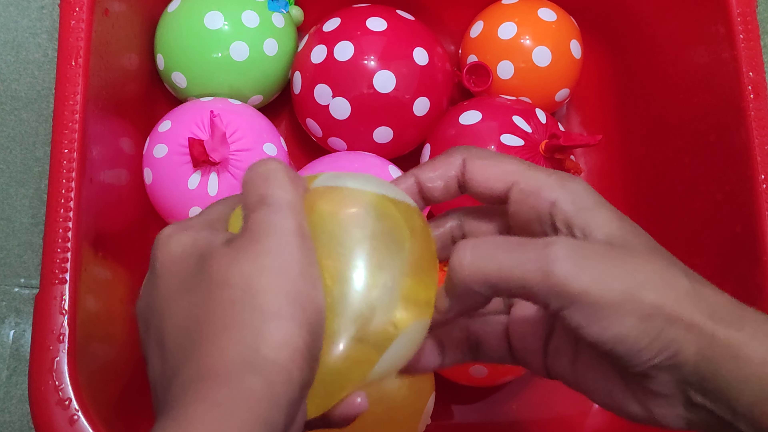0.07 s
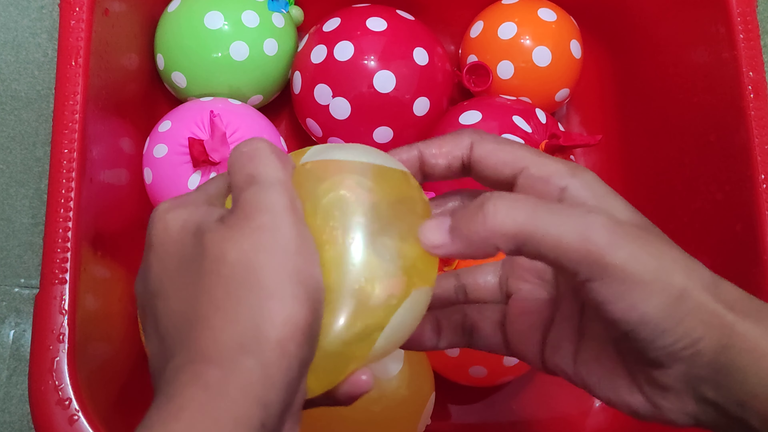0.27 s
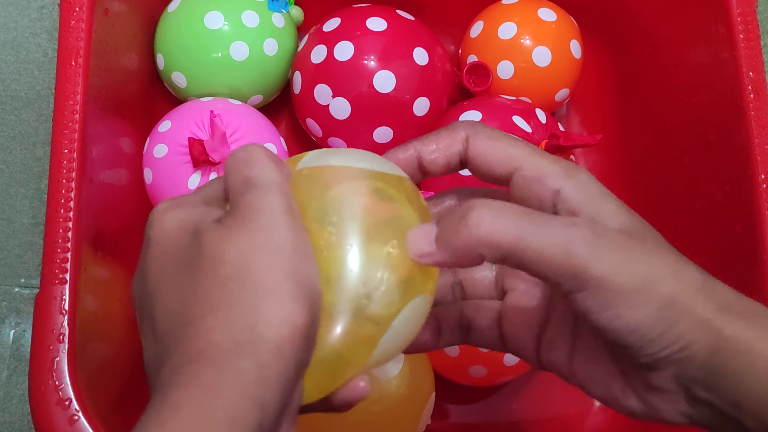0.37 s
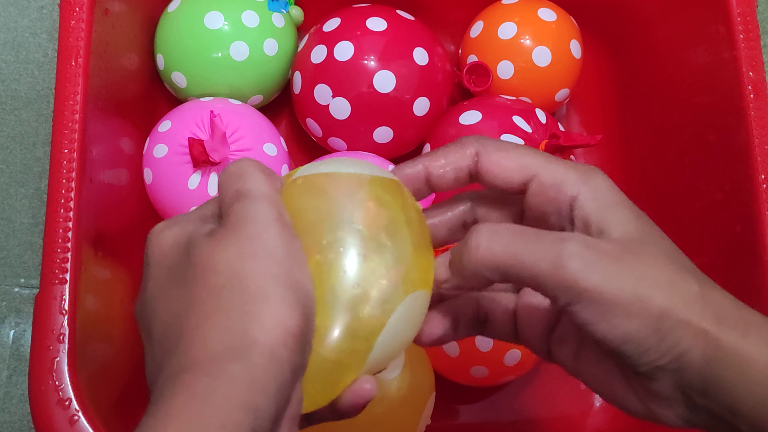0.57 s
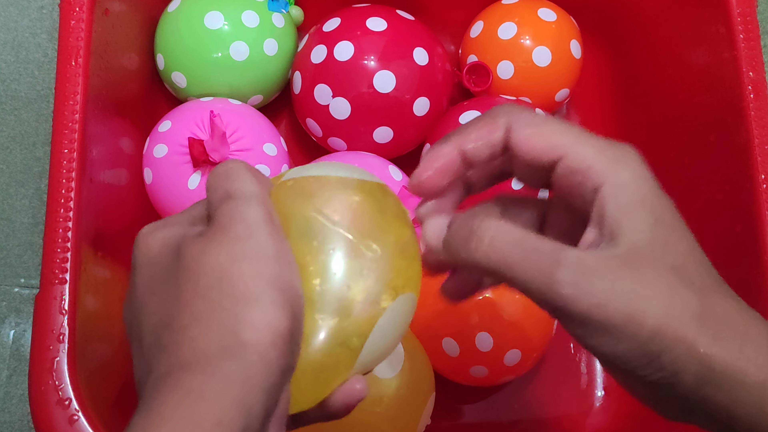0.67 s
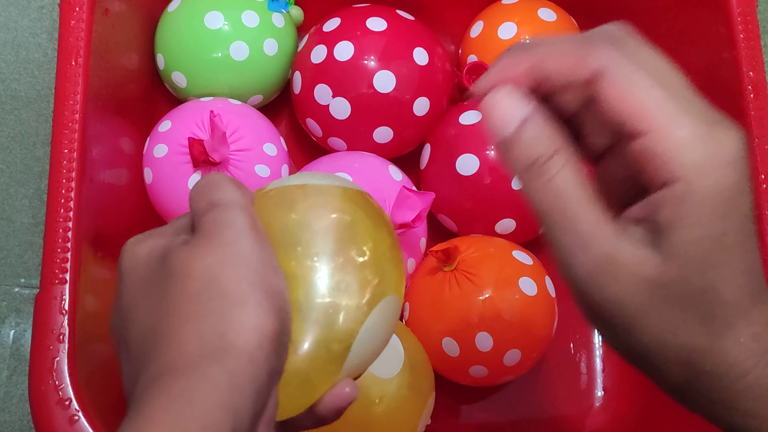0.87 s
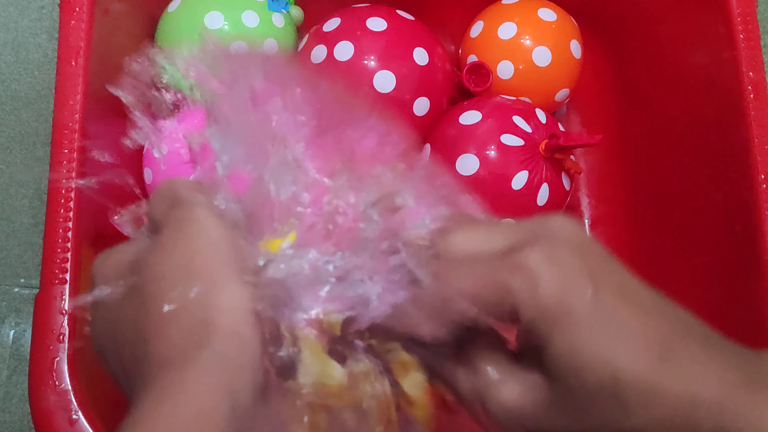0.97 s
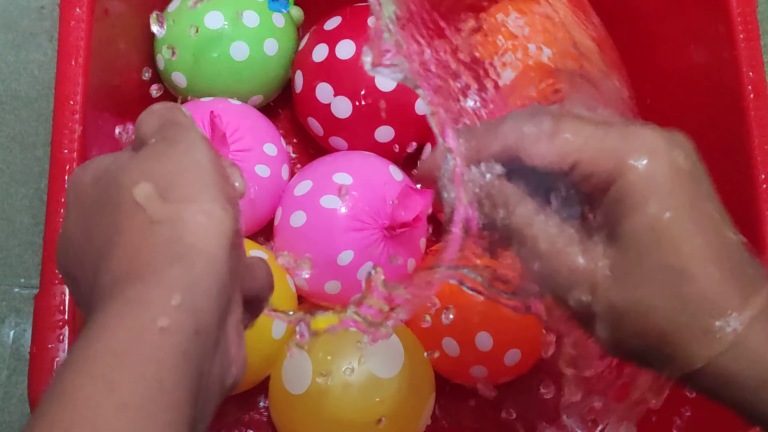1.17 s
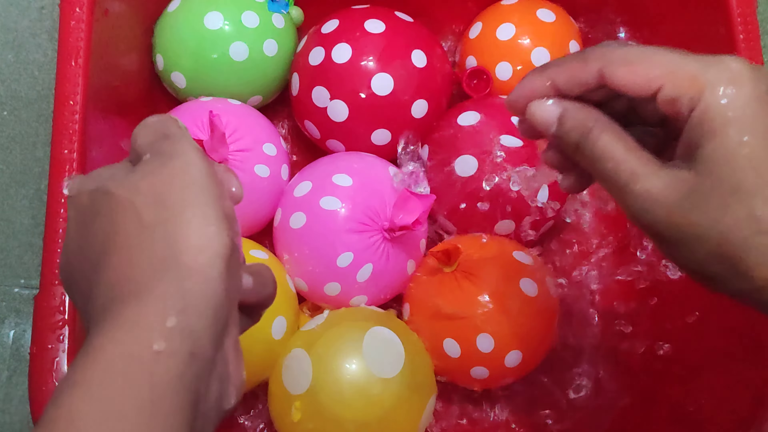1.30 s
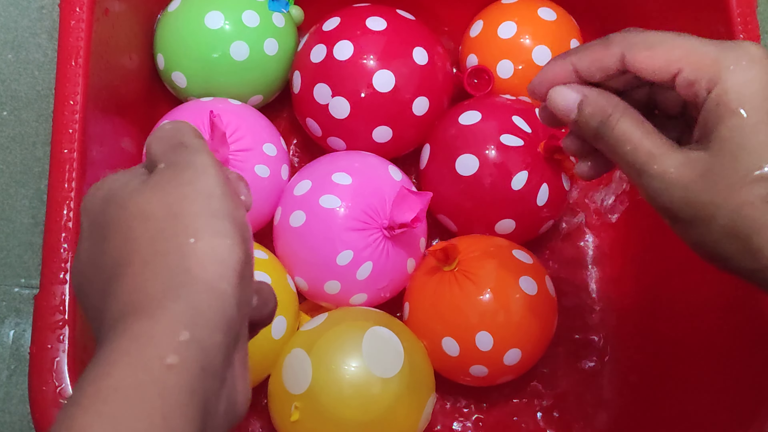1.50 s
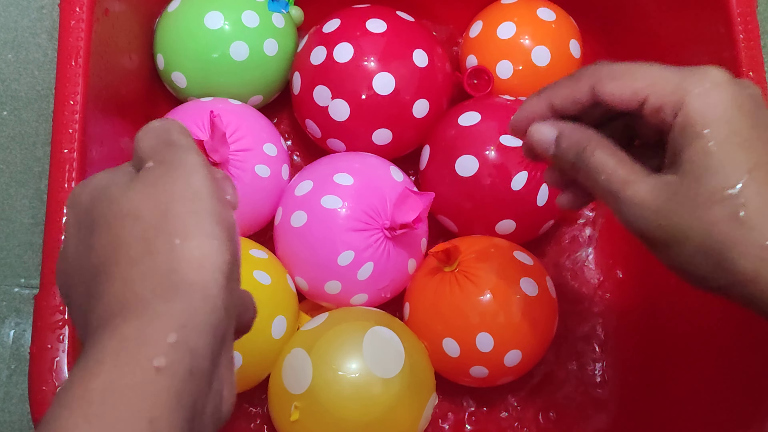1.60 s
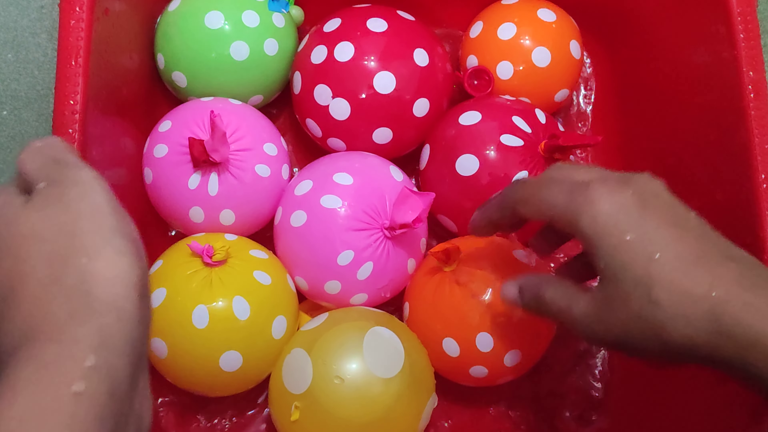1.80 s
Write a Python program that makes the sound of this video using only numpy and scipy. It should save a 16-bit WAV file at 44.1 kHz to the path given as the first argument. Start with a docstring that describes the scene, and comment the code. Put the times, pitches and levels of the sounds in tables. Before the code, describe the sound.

A water balloon bursts in a small, hard-walled room. Fingers first rub and squeak on the wet rubber, then comes a sharp crack, and water slaps onto other balloons and sloshes in a plastic tub, ending in a few drips.

```python
"""A water balloon bursts

Fingers pinch a water balloon over a plastic tub in a small, hard-walled room: the wet rubber sticks,
slips and squeaks. The skin bursts with a crack and a puff of air; the water slaps onto other balloons,
sprays and runs off into the tub. A few last drops tick, and the room rings after everything."""
import sys
import numpy as np
from scipy import signal
from scipy.fft import rfft, irfft, next_fast_len
from scipy.io import wavfile
from scipy.ndimage import map_coordinates

SR = 44100
rng = np.random.default_rng(int(sys.argv[2]) if len(sys.argv) > 2 else 0)


def wrap_up_sound(samples):
    """Save the sound to the file named by the first command line argument, as 16-bit audio."""
    columns = np.atleast_2d(samples).T
    # keep every value between -1 and 1, then stretch to whole-number steps
    tamed = np.clip(columns, -1, 1)
    steps = np.round(tamed * 32767).astype(np.int16)
    wavfile.write(sys.argv[1], SR, steps)


N = 81585

# Levels in a table are relative: they compare its rows with each other.
# A fade time is how long a sound takes to drop by 60 dB. A tone says how strong each frequency is.

# the skin tears and whips back (time [s], level [dB], fade time [s])
TEARS = [(1.0093, -4.5, 0.029), (1.0185, -12.5, 0.041), (1.031, -17.5, 0.011)]
# tone of the crack (frequency [Hz], level [dB])
CRACK_TONE = [(60, -24), (150, -20.5), (400, -15), (800, -10), (1200, -11.5), (1900, -4), (3800, -2.5),
              (5500, -9.5), (9000, -23), (15500, -19)]
# finger strokes on the rubber (time [s], length [s], rise [s], level [dB], slip rate [Hz],
# pitch glide [octaves], roughness [0-1], treble [dB], ring of the skin at the slip rate [dB])
STROKES = [(0.0, 0.017, 0.00067, -27.5, 850, 0.043, 0.77, 0.5, 9),
           (.1033, .0032, .0002, -14.5, 2200, 0, .8, 2, 0),
           (0.11, 0.011, 0.00024, -15.5, 810, 0.018, 0.77, -1.5, 7),
           (0.123, 0.034, 0.0021, -17, 1255, -0.02, .45, 7.5, 3.5),
           (0.217, .08, 0.02, -23.5, 1150, .1, .7, -0.5, -2.5),
           (.321, .056, .034, -18.5, 1065, .02, .55, 2, 2),
           (0.434, .025, .01, -31.5, 1300, -0.0093, .8, -12, -3),
           (.5343, .008, .0002, -12.5, 1390, 0, .65, 1, 5),
           (0.543, 0.0218, 0.0007, -15.5, 1410, -.05, .65, 3.5, -12),
           (0.61, 0.098, 0.047, -23, 1330, 0.052, .65, -3.5, -4.5),
           (0.705, 0.039, 0.0078, -32.5, 1240, -0.0024, .6, 3.5, 4)]
# tone of the stretched rubber (frequency [Hz], level [dB])
SKIN_TONE = [(180, -75), (300, -27), (526, -33.5), (680, -22.5), (800, -15.5), (1050, -6.5), (1400, -9),
             (1650, -11), (2000, 1), (2350, -2.5), (3200, -6), (4000, -8.5), (4900, -10), (7370, -12.5),
             (8990, -22), (11300, -19), (15500, -23)]
# pitches at which the rubber rings (frequency [Hz], width [Hz], level [dB])
SKIN_RINGS = [(1910, 72, -1), (2200, 84, -22), (2310, 16, -2), (2440, 25, -4), (2836, 59, 9.5),
              (3130, 37, -6), (3770, 110, 7), (4000, 42, -2), (5795, 110, 7.5), (6650, 160, -7)]
# tone of water striking the balloons (frequency [Hz], level [dB])
SLAP_TONE = [(240, -32), (400, -8.5), (453, -26.5), (870, -12), (1420, -10), (1940, -3), (2720, -1),
             (4670, -2), (8000, -14), (10400, -38), (17600, -120)]
# its loudness over time (time [s], level [dB])
SLAP_LEVELS = [(1.07, -18.5), (1.09, -25.5), (1.162, -21.5), (1.32, -33), (1.398, -32), (1.406, -30),
               (1.512, -43.5), (1.6, -43.5)]
# tone of the fine spray (frequency [Hz], level [dB])
SPRAY_TONE = [(2500, -33), (5000, -11), (6600, -0.5), (8800, -10.5), (11000, -4.5), (14000, -5.5),
              (16000, -4)]
# its loudness over time (time [s], level [dB])
SPRAY_LEVELS = [(1.07, -24.5), (1.082, -39.5), (1.302, -33.5), (1.34, -39.5), (1.358, -30.5),
                (1.388, -34.5), (1.404, -31.5), (1.6, -54)]
# tone of water moving in the tub (frequency [Hz], level [dB])
SLOSH_TONE = [(25, -16), (60, -18), (120, -2.5), (200, -10), (260, -0.5), (350, 1), (600, -3.5), (900, 3.5),
              (1600, -15.5)]
# its loudness over time (time [s], level [dB])
SLOSH_LEVELS = [(1.08, -57), (1.164, -38), (1.41, -39.5), (1.85, -52)]
# single drops on tight rubber (time [s], level [dB], pitch [Hz], width [octaves], fade time [s])
LAST_DROPS = [(1.3577, -22.5, 11400, 1.2, 0.013), (1.625, -25, 11100, 2.2, 0.0042),
              (1.637, -30.5, 2070, 0.43, 0.014), (1.6654, -28.5, 13800, 0.22, 0.012),
              (1.7185, -38, 5990, 0.16, 0.037), (1.806, -41, 3900, 0.13, 0.033),
              (1.83, -45, 4030, 0.073, 0.021)]
# big air pockets in the tub (time [s], level [dB], pitch [Hz])
AIR_POCKETS = [(1.2, -36, 249), (1.32, -37.5, 356.5), (1.395, -33, 324.7), (1.615, -50, 315)]
# low notes at which the tub and room ring (pitch [Hz], level [dB])
BOOM_NOTES = [(86.1, -54), (156.1, -55), (204.6, -78), (242.2, -59), (323.0, -55), (409.1, -77),
              (495.3, -59), (570.6, -53.5), (683.7, -60.5)]
# slow swings of air pressure (time [s], width [s], left [amplitude], right [amplitude])
AIR_SWAYS = [(.15, .03, -0.025, -.02), (.26, 0.069, 0.026, 0.018), (0.562, 0.015, -0.016, -0.018),
             (.68, 0.052, 0.012, .015), (1.16, 0.077, -0.046, 0.054), (1.25, 0.097, -.11, -0.023)]
# tone of the room's rumble (frequency [Hz], level [dB])
RUMBLE_TONE = [(25, 13), (60, 6), (90, -4), (150, -2.5), (330, -2), (600, -3.5), (2000, -12.5),
               (8000, -25.5), (16000, -33)]
# how long the room echoes (frequency [Hz], fade time [s])
ECHO_FADES = [(100, 0.3), (500, 0.34), (1300, 0.51), (3500, 0.53), (9000, 0.36), (15000, 0.43)]
# how alike left and right sound (frequency [Hz], likeness [0-1])
LIKENESS = [(60, 0.2), (250, 0.79), (500, 0.56), (1000, 0.041), (15000, 0.075)]

POP_S = TEARS[0][0]
LEAD_MS = 0.094  # the balloon is left of centre, so the left microphone hears it first


def pop():
    """The skin rips with a sharp snap and a few quick cracks, and pushes air mostly to the left."""
    snap_s, puff_rise_s, puff_fall_s = 0.00024, 0.001, 0.011
    t = since(POP_S)
    rip = sum(amp(db) * burst(start, fade_s) for start, db, fade_s in TEARS)
    crack = coloured(rip, tone(CRACK_TONE))
    snap = amp(-7) * (t > 0) * (1 - t / snap_s) * np.exp(-t / snap_s)  # the first pressure spike
    puff = amp(-7) * (1 - np.exp(-t / puff_rise_s)) * np.exp(-t / puff_fall_s)
    return room(snap + crack, echo_db=3.5, lead_ms=LEAD_MS) + np.outer([1, -0.25], puff)


def squeaks():
    """Each stroke is a fast run of slips that rings the rubber; the rougher, the more uneven it is."""
    release_s, treble_hz, ring_width_hz, wander_octaves = 0.0052, 5000, 300, 0.27
    rubbing = np.zeros(N)
    for start, length, rise, db, slip_hz, glide, rough, treble_db, ring_db in STROKES:
        t = since(start)
        bend = glide * (np.minimum(t / length, 1) - 0.5)
        rate = slip_hz * 2 ** (bend + wander_octaves * rough * wobble(170.37))
        phase = 2 * np.pi * np.cumsum(rate) / SR
        slips = unit(sum(np.cos(k * phase) * (k * rate < SR / 2) for k in range(1, 16)))
        scrape = unit(rng.standard_normal(N) * (1 + np.cos(phase)))  # a hiss with each slip
        stroke = np.sqrt(1 - rough) * slips + np.sqrt(rough) * scrape
        treble = lambda hz: treble_db * hz ** 2 / (hz ** 2 + treble_hz ** 2)
        stroke = filtered(stroke, lambda hz: amp(treble(hz) + ring_db * peak(hz, slip_hz, ring_width_hz)))
        loudness = np.minimum(t / rise, 1) * np.exp(-since(start + length) / release_s)
        rubbing += amp(db) * stroke * loudness
    rings = lambda hz: sum(amp(db - 5.5) * peak(hz, centre, width) for centre, width, db in SKIN_RINGS)
    skin = coloured(rubbing, lambda hz: tone(SKIN_TONE)(hz) * (1 + rings(hz)))
    return room(skin, echo_db=2.5, lead_ms=LEAD_MS)


def splash():
    """Water slaps the balloons, breaks into fine spray and sloshes in the tub, on both sides."""
    rise_s, trickle_s = 0.12, 1.574  # after trickle_s only a fading trickle is left
    slap = water(SLAP_TONE, hiss=0.5, count=2500, hz=2393, octaves=1.73,
                 cycles=2.95, scatter_db=4, chirp=0.028, samples=600)
    spray = water(SPRAY_TONE, hiss=0.55, count=3000, hz=8600, octaves=1,
                  cycles=2.1, scatter_db=2, chirp=0.0085, samples=120)
    slosh = water(SLOSH_TONE, hiss=3, count=400, hz=474, octaves=1.34,
                  cycles=3.4, scatter_db=6, chirp=0.02, samples=2000)
    level_db = lambda rows: np.interp(since(0), *np.transpose(rows))
    slap *= amp(level_db(SLAP_LEVELS) - 30 * since(trickle_s))
    spray *= amp(level_db(SPRAY_LEVELS) + 1 - 19 * since(trickle_s))
    slosh *= amp(level_db(SLOSH_LEVELS) - 2)
    swell = np.minimum(since(POP_S) / rise_s, 1)
    return room((slap + spray + slosh) * swell, echo_db=0)


def water(tone_rows, hiss, **droplet_settings):
    """A steady stereo rush of water: droplets plus hiss, shaped to one tone."""
    rush = lambda: droplets(**droplet_settings) + hiss * rng.standard_normal(N)
    pair = np.array([coloured(rush(), tone(tone_rows)) for _ in range(2)])
    return unit(spread(pair))


def droplets(count, hz, octaves, cycles, scatter_db, chirp, samples):
    """A steady patter of tiny droplets and bubbles, each ringing briefly as its pitch rises."""
    when, height, softness = rng.random((count, 3)).T[:, :, None]
    pitch = hz * 2 ** (octaves * (2 * height - 1))
    age = pitch * np.arange(samples) / SR / cycles  # reaches 1 after about `cycles` swings
    strength = amp(-scatter_db * np.log(0.034 + softness))  # many soft ones, a few loud
    fade = np.exp(-age) * np.linspace(1, 0, samples)
    pings = strength * fade * np.sin(2 * np.pi * cycles * age * (1 + chirp * age))
    places = (when * N).astype(int) + np.arange(samples)
    return unit(np.bincount(places.ravel(), pings.ravel(), N)[:N])  # add each ping at its place


def drops():
    """Stray drops tick on the balloons, each a short band of noise."""
    ticks = np.zeros(N)
    for start, db, pitch, octaves, fade_s in LAST_DROPS:
        band = lambda hz: 1 / (1 + (np.log2((hz + 1) / pitch) / octaves) ** 2)
        ticks += amp(db) * coloured(burst(start, fade_s), band)
    return room(ticks, echo_db=5.5)


def gulps():
    """Trapped air rings low under the falling water."""
    ring = lambda t, hz: swell_and_fade(t, rise_s=0.012, fade_s=0.41) * np.sin(2 * np.pi * hz * t)
    return sum(amp(db) * ring(since(start), hz) for start, db, hz in AIR_POCKETS)


def boom():
    """The weight of the water sets the low notes of the tub and room ringing."""
    t = since(1.08)
    swell = swell_and_fade(t, rise_s=0.21, fade_s=2.4)
    ring = sum(amp(db + 1.8 * wobble(6.99)) * np.sin(2 * np.pi * hz * t + 0.64 * wobble(9.2))
               for hz, db in BOOM_NOTES)
    return amp(5) * ring * swell / swell.max()


def sway():
    """Air moved by the hands and the falling water presses slowly on each microphone."""
    return sum(np.outer([left, right], np.exp(-((since(0) - time) / width) ** 2))
               for time, width, left, right in AIR_SWAYS)


def background():
    """The room rumbles faintly, and one of its low notes hums all the time."""
    hum_hz = 90.5
    hum = amp(-62 + 0.67 * wobble(5.1)) * np.sin(2 * np.pi * hum_hz * since(0) + 0.5 * wobble(4.8))
    rumble = filtered(spread(rng.standard_normal((2, N))), tone(RUMBLE_TONE))
    return hum + amp(-53.5) * unit(rumble)


def room(x, echo_db, lead_ms=0):
    """The direct sound, quick bounces off the tub and the longer echo of the hard walls."""
    bounce_db, bounce_s = -1, 0.0025
    hz, t, bands = signal.stft(rng.standard_normal((2, SR)), SR, nperseg=256)
    bands = bands / 1000 ** (t / along(ECHO_FADES, hz)[:, None])  # each band fades at its own speed
    tail = signal.istft(bands, SR, nperseg=256)[1][:, :SR]
    bounces = rng.standard_normal((2, SR)) * np.exp(-np.arange(SR) / SR / bounce_s)
    echo = spread(amp(echo_db) * tail / np.linalg.norm(tail[0])
                  + amp(bounce_db) * bounces / np.linalg.norm(bounces[0]))
    # left comes lead_ms before right
    direct = filtered(x, lambda hz: np.exp(1j * np.pi * np.outer([1, -1], hz) * lead_ms / 1000))
    return (direct + signal.fftconvolve(direct, echo, axes=1)[:, :N]) / np.sqrt(2)


def spread(pair):
    """Mix two unrelated signals into a left and right that are alike only in the bass."""
    angle = lambda hz: np.arccos(along(LIKENESS, hz)) / 2
    mid, side = filtered(pair, lambda hz: np.array([np.cos(angle(hz)), np.sin(angle(hz))]))
    return np.array([mid + side, mid - side])


def amp(db):
    """Turn decibels into a number to multiply by."""
    return 10 ** (np.asarray(db) / 20)


def unit(x):
    """Scale a signal to an average power of 1."""
    return x / np.sqrt(np.mean(x ** 2) + 1e-20)


def since(start):
    """Seconds since the start, zero before it."""
    return np.maximum(np.arange(N) / SR - start, 0)


def burst(start, fade_s):
    """Noise that starts suddenly and dies away."""
    t = since(start)
    return rng.standard_normal(N) * (t > 0) / 1000 ** (t / fade_s)


def swell_and_fade(t, rise_s, fade_s):
    """A loudness curve that grows and then dies away."""
    return (1 - np.exp(-t / rise_s)) / 1000 ** (t / fade_s)


def wobble(rate):
    """A smooth curve through `rate` random values a second."""
    return map_coordinates(rng.standard_normal(4096), [np.arange(N) * rate / SR], mode="wrap")


def along(rows, hz):
    """Read between the rows of a (frequency, value) table, with octaves evenly spaced."""
    frequencies, values = np.transpose(rows)
    return np.interp(np.log(hz + 1), np.log(frequencies + 1), values)


def tone(rows):
    """Turn a tone table into a gain for any frequency."""
    return lambda hz: amp(along(rows, hz))


def peak(hz, centre, width):
    """A bump of height 1 around one frequency."""
    return 1 / (1 + (2 * (hz - centre) / width) ** 2)


def filtered(x, gain):
    """Multiply each frequency in x by gain(hz)."""
    size = next_fast_len(N + SR // 2)
    return irfft(rfft(x, size) * gain(np.fft.rfftfreq(size, 1 / SR)), size)[..., :N]


def coloured(x, gain, size=4096):
    """Give x a tone, using a filter of energy 1 that rings only after each sound, never before."""
    log_gain = np.log(np.maximum(gain(np.fft.rfftfreq(size, 1 / SR)), 1e-6))
    cepstrum = irfft(log_gain)  # the tone laid out in time; its late half is folded onto the early half
    cepstrum[1:size // 2] *= 2
    cepstrum[size // 2 + 1:] = 0
    ring = irfft(np.exp(rfft(cepstrum)))
    return signal.fftconvolve(x, ring / np.linalg.norm(ring))[:len(x)]


def scene():
    """Squeaks, pop and water in one room, with the water a little to the right."""
    lean_right = amp([[-0.5], [0.5]])
    return squeaks() + pop() + (splash() + drops()) * lean_right + boom() + gulps() + sway() + background()


def record(dry):
    """Round off the loudest peaks and cut away the very highest treble."""
    ceiling, hardness, top_hz = 0.97, 6, 15900
    rounded = dry / (1 + np.abs(dry / ceiling) ** hardness) ** (1 / hardness)
    return filtered(rounded, lambda hz: 1 / (1 + (hz / top_hz) ** 120))


dry = scene()
out = record(dry)
wrap_up_sound(out)
```